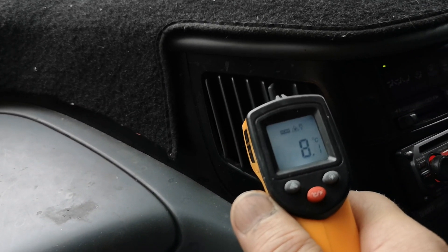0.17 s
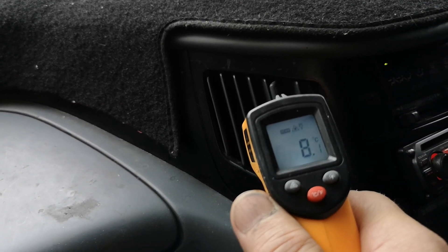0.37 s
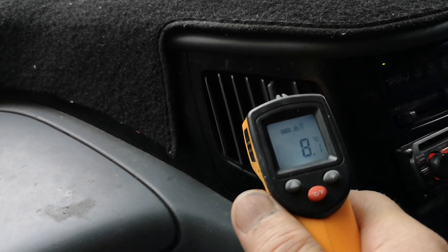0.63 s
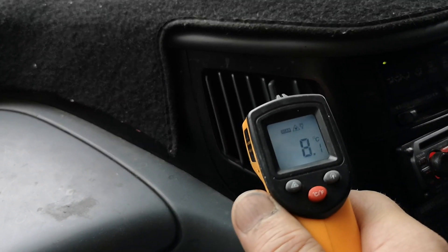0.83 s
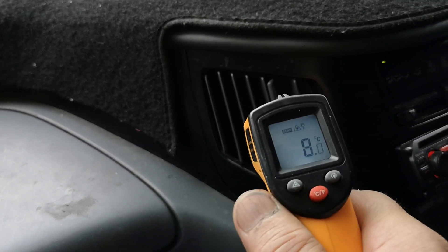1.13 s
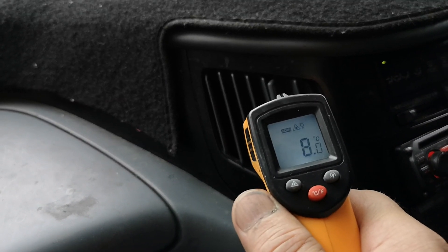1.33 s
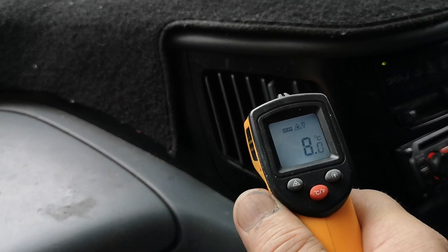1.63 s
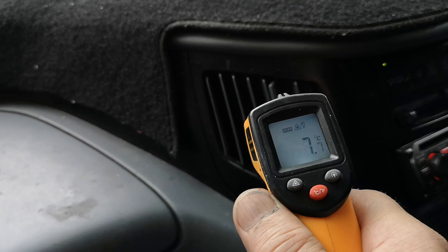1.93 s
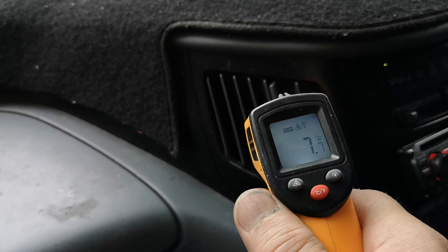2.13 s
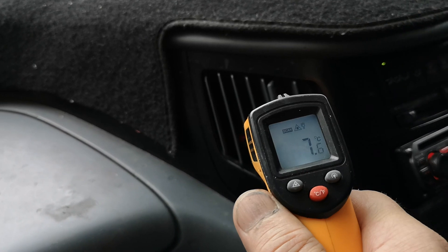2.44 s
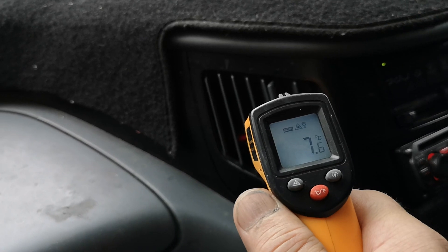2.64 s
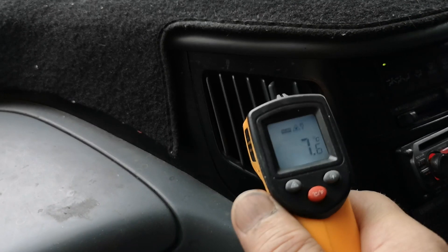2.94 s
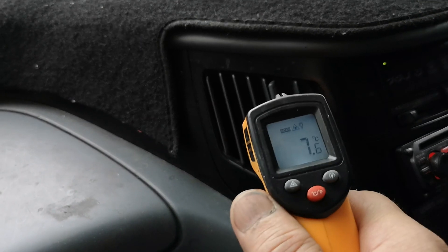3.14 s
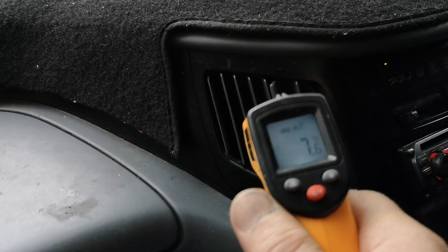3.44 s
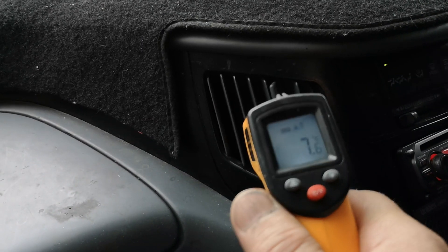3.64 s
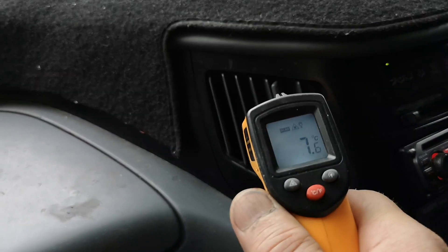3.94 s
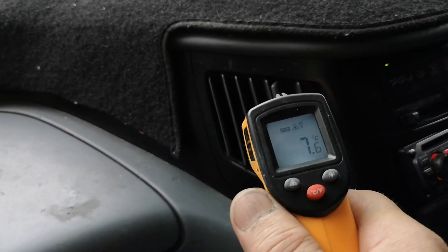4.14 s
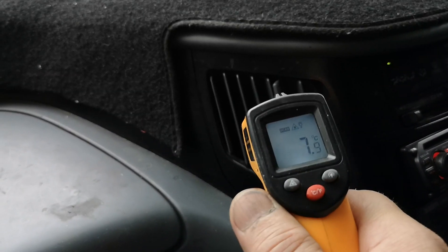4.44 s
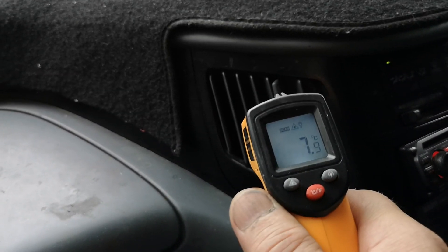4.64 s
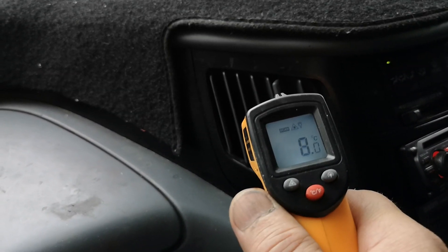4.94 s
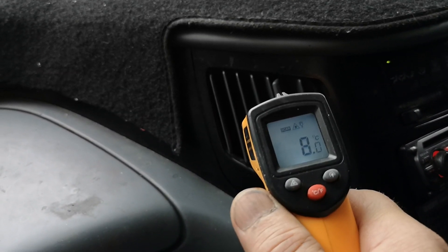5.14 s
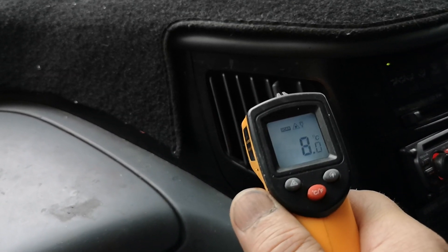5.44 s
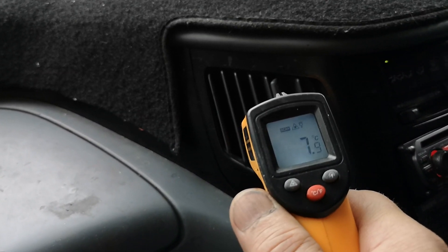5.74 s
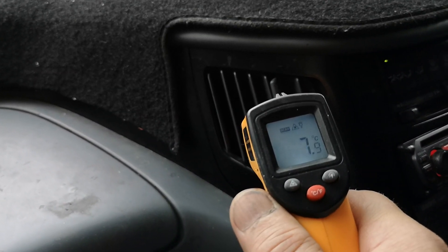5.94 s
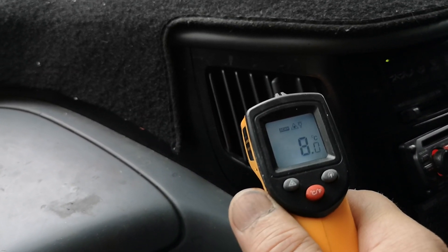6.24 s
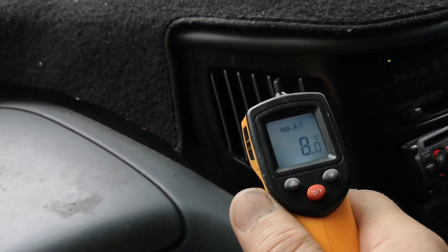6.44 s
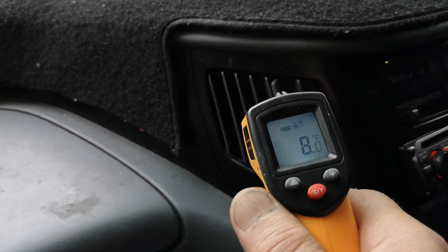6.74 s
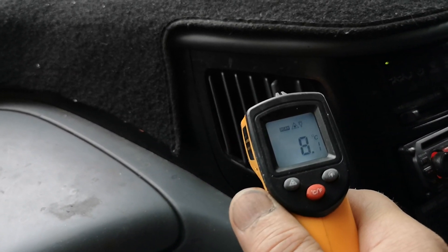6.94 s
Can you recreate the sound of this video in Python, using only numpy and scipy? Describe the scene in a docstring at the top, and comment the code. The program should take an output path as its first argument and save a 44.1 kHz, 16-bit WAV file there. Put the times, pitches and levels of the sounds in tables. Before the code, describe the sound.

A constant low engine boom fills a small, dry car cabin while vent air rushes quietly and hollowly near the microphone. Dull wind thumps batter it at uneven intervals, separate at first, sparser in the middle, then thicker and in rumbling clusters until the end. A very faint, high, fuzzy slat whistle hides in the hiss. Close stereo pickup, with the puffs differing slightly between sides.

```python
"""A car's air conditioning blows from a dashboard vent while the engine idles, heard close to the grille.
From the start the cabin booms at the engine's firing rate (sine waves), air rushes (coloured noise), and
puffs of the jet buffet two microphone ports (short pulses with noisy wakes). A faint whistle at the slats
(narrow noise) is clearest near 1.5 s. The listed puffs thin out from about 2.2 s; after 4.2 s they crowd
together, with a second rise of the whistle near 4.6 s. All of it runs on to the end at about 7.1 s."""
import sys
import numpy as np
from scipy import signal
from scipy.fft import rfft, irfft, next_fast_len
from scipy.io import wavfile

SR = 44100
rng = np.random.default_rng(int(sys.argv[2]) if len(sys.argv) > 2 else 0)


def pcm_store(signal):
    """Save signal as 16-bit PCM."""
    levels = np.round(np.clip(np.atleast_2d(signal), -1, 1) * 32767)
    wavfile.write(sys.argv[1], SR, levels.astype(np.int16).T)


N = 313012  # length in samples


def amp(db):
    """Turns decibels into a gain."""
    return 10 ** (np.asarray(db) / 20)


def evened(x):
    """Scales a sound to an average strength (rms) of 1."""
    return x / np.sqrt(np.mean(x ** 2) + 1e-20)


def read(points, hz, axis=1):
    """Reads one column of a spectrum table, on a log-frequency axis."""
    columns = np.transpose(points)
    return np.interp(np.log(hz + 1), np.log(columns[0] + 1), columns[axis])


def curves(rows):
    """Draws the columns of a time table as lines, one value per sample."""
    s, *columns = np.transpose(rows)
    t = np.arange(N) / SR
    return [np.interp(t, s, column) for column in columns]


def noise(gain):
    """Makes noise of rms 1 whose spectrum is shaped by the function gain(Hz)."""
    size = next_fast_len(N)
    hz = np.fft.rfftfreq(size, 1 / SR)
    spectrum = rfft(rng.standard_normal(size)) * gain(hz)
    return evened(irfft(spectrum, size)[:N])


def wander(rate):
    """Makes a slow random curve of rms 1, changing up to about rate times a second."""
    return noise(lambda hz: np.exp(-(hz / rate) ** 2) * hz / (hz + 1))


def add(mix, start, sound):
    """Mixes a sound in from sample start on, cutting off what lies outside."""
    part = mix[max(start, 0):max(start + len(sound), 0)]
    part += sound[max(-start, 0):][:len(part)]


# Firing rate of the idling engine. Each row: time in seconds, rate in Hz.
FIRING_RATE = [(0, 39.5), (.6, 38.8), (1.25, 38.2), (1.7, 39), (2.4, 38.8), (3.0, 39.9), (3.9, 39.7),
               (4.8, 38.3), (5.35, 38.9), (5.85, 38.4), (6.3, 39.5), (7.1, 39.2)]
# Tones tied to the engine. Each row: multiple of the firing rate, level in dB rms.
ENGINE_ORDERS = [(.5, -32), (1, -18), (2, -46.5), (3, -38.5)]
# Steady low hums, the upper perhaps from the turning blower. Each row: frequency in Hz, level in dB rms.
LOW_HUMS = [(22.9, -33.5), (52.6, -36)]


def engine():
    """The firing rate hunts a little and the cabin booms with it, over steady hums, alike at both ports."""
    t = np.arange(N) / SR
    firings = np.cumsum(curves(FIRING_RATE)[0]) / SR  # firings counted so far
    boom = sum(amp(db) * np.sin(2 * np.pi * (k * firings + rng.random())) for k, db in ENGINE_ORDERS)
    hums = sum(amp(db) * np.sin(2 * np.pi * (hz * t + rng.random())) for hz, db in LOW_HUMS)
    return np.sqrt(2) * (boom + hums)  # a sine of rms 1 peaks at the root of 2


# Colour of the rushing air. Each row: frequency in Hz, relative left and right level in dB per Hz.
AIR_COLOUR = [(623, -2, -5.5), (940, -8, -12), (1724, -0.5, -6), (2940, -6.5, -12.5), (2975, -9.5, -16),
              (4400, -17, -21), (5840, -15.5, -21), (6140, -21, -25.5), (7730, -15, -26),
              (8200, -19, -32.5), (9180, -20.5, -25), (9880, -34, -28.5), (11000, -36, -36.5),
              (14800, -42.5, -43)]
# Resonances of duct and grille.
# Each row: centre in Hz, half-width in Hz (to 1/e of the dB lift), left and right lift in dB.
DUCT_RESONANCES = [(671, 44, 7, 3), (977, 110, 7, 4), (1310, 100, 5.5, 5), (1460, 67, 2.5, 0),
                   (1738, 25, 1.5, 6), (1852, 45, 4, 1), (1970, 58, -2, 5), (2510, 25, 2, -3),
                   (2613, 30, 4, 3.5), (2730, 49, -1, 0.5), (3425, 22, 6.5, -2.5)]
# Likeness of the rush at the two ports. Each row: frequency in Hz, correlation from -1 to 1.
PORT_LIKENESS = [(200, 0.91), (450, -0.52), (780, -0.05), (1000, 0.15), (1450, 0.58), (1900, -0.021),
                 (2300, -0.17), (3300, 0.094), (9000, -0.07)]
AIR_DB = -40.5  # rms over both ports, before the wavering and swelling


def vent(waver_db, waver_rate):
    """Turbulence at the slats, coloured by the duct; each port hears its own mix of the resonances."""
    size = next_fast_len(N)
    hz = np.fft.rfftfreq(size, 1 / SR)
    left, other = rfft(rng.standard_normal((2, size)))
    same = np.clip(read(PORT_LIKENESS, hz), -1, 1)
    right = same * left + np.sqrt(1 - same ** 2) * other
    colour_db = np.array([read(AIR_COLOUR, hz, axis=1), read(AIR_COLOUR, hz, axis=2)])
    for centre, width, *lift_db in DUCT_RESONANCES:
        colour_db += np.outer(lift_db, np.exp(-((hz - centre) / width) ** 2))
    rush = evened(irfft(np.array([left, right]) * amp(colour_db), size)[:, :N])
    return amp(AIR_DB + waver_db * wander(waver_rate)) * rush


# Gain of the brightest band of the rush. Each row: time in seconds, gain in dB.
BAND_SURGE = [(0, -.5), (.28, 0.9), (.7, 1), (.85, 1), (1.05, 0.2), (1.4, 0.5), (1.62, 0.5), (1.98, -0.2),
              (2.3, 1), (2.5, 1), (2.9, -.2), (3.28, 1), (3.78, 0.4), (3.95, 1.5), (4.6, 0.2), (6.0, 0.4),
              (6.38, 0.8), (6.7, 0.7)]


def swelling(rush, centre_hz, width_hz):
    """The brightest band of the rush swells and sinks gently on its own."""
    size = next_fast_len(N)
    hz = np.fft.rfftfreq(size, 1 / SR)
    bell = np.exp(-((hz - centre_hz) / width_hz) ** 2)
    band = irfft(rfft(rush, size) * bell, size)[:, :N]
    return rush + band * (amp(curves(BAND_SURGE)[0]) - 1)


# Strength of the whistle at the slats. Each row: time in seconds, left level in dB rms.
WHISTLE_LEVEL = [(0, -70), (1.3, -68.5), (1.55, -65), (1.9, -70), (2.3, -70), (2.6, -70), (3.3, -72),
                 (4.3, -75), (4.6, -67), (5.3, -69), (5.6, -76), (7.1, -75)]
WHISTLE_HZ = 9045


def whistle(right_db, width_hz):
    """Air over a sharp edge sings a thin, fuzzy note that comes and goes."""
    def peak(hz):
        """Lets through only a narrow peak around the note."""
        return 1 / (1 + ((hz - WHISTLE_HZ) / width_hz) ** 2)

    note = np.array([amp(db) * noise(peak) for db in (0, right_db)])
    return amp(curves(WHISTLE_LEVEL)[0]) * note


# Colour of the jet's flutter on the microphone. Each row: frequency in Hz, relative level in dB per Hz.
FLUTTER_COLOUR = [(4, -24), (20, -7.5), (72, -1), (110, -3.5), (160, -9.5), (230, -17), (330, -20.5),
                  (450, -26.5), (700, -62), (2000, -83)]
# Strength of the jet on the microphone. Each row: time in seconds, level in dB before the flutter's trim.
JET_LEVEL = [(0, -24), (2.4, -25.5), (4.0, -25.5), (5.2, -23.5), (6.1, -23.5), (6.45, -26.5), (7.1, -23.5)]


def flutter(lumps, level_db, split_hz):
    """Small eddies pass without pause; their upper part comes in lumps."""
    flow = noise(lambda hz: amp(read(FLUTTER_COLOUR, hz)))
    lowpass = signal.butter(2, split_hz, fs=SR, output="sos")
    slow = signal.sosfiltfilt(lowpass, flow)
    lumpy = lumps * (flow - slow)
    return amp(curves(JET_LEVEL)[0] + level_db) * evened(slow + lumpy)


# Longer swells of the jet under the clusters of puffs.
# Each row: middle in seconds, length in seconds, level in dB before a common trim.
JET_SWELLS = [(1.915, 0.047, -29.5), (2.147, 0.045, -29), (4.217, 0.06, -29), (4.47, 0.12, -26),
              (4.61, 0.08, -26.5), (4.72, .08, -28), (5.01, .09, -25.5), (5.45, 0.077, -25),
              (6.205, 0.08, -27.5), (6.735, .14, -22)]


def swells(level_db, knee_hz, steep):
    """The jet leans on the microphone for a moment: a soft, low roar that joins the puffs."""
    t = np.arange(N) / SR
    power = sum(amp(db) ** 2 * np.exp(-(2 * (t - s) / length) ** 2) for s, length, db in JET_SWELLS)
    roar = noise(lambda hz: (hz / knee_hz) ** 1.4 / (1 + (hz / knee_hz) ** steep))
    return amp(level_db) * np.sqrt(power) * roar


# Level over the jet and its spread either way are in dB, before the trim of the puffs.
EDDIES_PER_S, EDDY_DB, EDDY_SPREAD_DB, EDDY_HZ = 6, -4, 4, 175


def eddies(count=80):
    """The slats shed small eddies at uneven intervals, their strength following the jet; rows like PUFFS."""
    late = rng.random(count)
    strength = 2 * rng.random(count) - 1
    times = (np.arange(count) + late) / EDDIES_PER_S
    levels = np.interp(times, *np.transpose(JET_LEVEL)) + EDDY_DB + EDDY_SPREAD_DB * strength
    return [(s, db, EDDY_HZ) for s, db in zip(times, levels) if s < N / SR]


PUFF_S = .01  # a puff's level is its rms if all its energy fell within this many seconds


def buffets(rows, level_db, narrow, spill_db, wake, wake_s, size=4096):
    """Each puff is one quick swing of pressure in a short, uneven wake; faster ones reach higher."""
    t = (np.arange(size) - size // 2) / SR  # the puff sits in the middle of its frame
    hz = np.fft.rfftfreq(size, 1 / SR)
    out = np.zeros(N)
    for s, db, centre_hz in rows:
        swing = np.exp(2j * np.pi * rng.random()) * rfft(1.0 * (t == 0))
        swirl = np.exp(-abs(t) / wake_s) * rng.standard_normal(size)
        swirl /= np.linalg.norm(swirl)
        ratio = hz / centre_hz
        hump = (ratio * np.exp(.5 - .5 * ratio ** 2)) ** narrow
        spill = amp(spill_db) * ratio ** 2 / (1 + ratio ** 5)  # spreads wider around the hump
        puff = irfft((swing + wake * rfft(swirl)) * (hump + spill))
        puff *= np.sqrt(PUFF_S * SR / np.sum(puff ** 2))
        add(out, int(s * SR) - size // 2, amp(db + level_db) * puff)
    return out


def across_ports(right, stray, crossing_s, weaker_db, small_hz, mixing):
    """Eddies reach the right port first; small ones arrive late, weakened and partly remixed at the left."""
    size = next_fast_len(N + SR // 10)
    hz = np.fft.rfftfreq(size, 1 / SR)
    small = hz ** 2 / (hz ** 2 + small_hz ** 2)  # near 0 for large eddies, near 1 for small ones
    lost = np.clip(mixing * small, 0, 1)
    delay = np.exp(-2j * np.pi * hz * crossing_s * small)
    carried = np.sqrt(1 - lost) * delay * rfft(right, size)
    remixed = np.sqrt(lost) * rfft(stray, size)
    left = amp(weaker_db * small) * (carried + remixed)
    return np.array([irfft(left, size)[:N], right])


# The puffs that hit the microphone, singly and in clusters.
# Each row: middle in seconds, level in dB before a common trim, centre in Hz.
PUFFS = [(.010, -18, 180), (.030, -22.5, 185), (.057, -17.5, 187), (.185, -24, 170), (0.375, -26, 207),
         (.450, -15.5, 155), (0.632, -21, 200), (0.748, -27.5, 157), (0.777, -27, 145), (.869, -23, 152),
         (0.912, -19.5, 146), (1.085, -20, 155), (1.194, -19, 175), (1.217, -23.5, 200), (1.316, -20, 148),
         (1.359, -14.5, 130), (1.575, -14.5, 150), (1.809, -17, 176), (1.9, -28.5, 455),
         (1.902, -19.5, 170), (1.925, -21.5, 225), (2.007, -23.5, 180), (2.152, -17.5, 190),
         (2.41, -32, 220), (2.471, -18.5, 134), (2.645, -24, 161), (2.862, -17, 154), (2.975, -21.5, 170),
         (3.085, -20, 168), (3.097, -16, 154), (3.135, -21.5, 135), (3.255, -30, 170), (3.285, -23, 168),
         (3.864, -20, 150), (3.898, -21, 157), (4.065, -32, 199), (4.224, -22, 245), (4.246, -26, 234),
         (4.434, -16, 190), (4.454, -20, 201), (4.485, -20.5, 275), (4.549, -13.5, 145), (4.62, -20.5, 202),
         (4.691, -23, 240), (4.718, -21.5, 185), (4.736, -13.5, 202), (4.863, -21.5, 195),
         (4.996, -14, 165), (5.029, -17.5, 184), (5.05, -23, 195), (5.103, -23.5, 143), (5.126, -17, 140),
         (5.190, -19.5, 158), (5.272, -15, 171), (5.282, -27, 415), (5.425, -22.5, 350),
         (5.438, -14.5, 167), (5.462, -15.5, 211), (5.479, -21, 220), (5.655, -19, 181), (5.795, -18, 154),
         (5.991, -16.5, 130), (6.072, -17.5, 160), (6.076, -21.5, 320), (6.190, -21.5, 240),
         (6.211, -27, 195), (6.234, -16.5, 235), (6.257, -24, 187), (6.667, -18, 155), (6.69, -13, 166),
         (6.721, -18.5, 175), (6.752, -23, 180), (6.772, -19.5, 166), (6.856, -28.5, 260),
         (6.89, -22.5, 192), (6.935, -20, 125), (6.99, -18.5, 164), (7.057, -22.5, 180)]


def jet(lumpy_db, lump_rate):
    """The jet on the microphone: two flows with puffs and swells at the same times, each with its own swirls."""
    lumps = amp(lumpy_db * np.tanh(wander(lump_rate)))
    gusts = [*PUFFS, *eddies()]

    def flow():
        """Adds up one flow of the jet."""
        steady = flutter(lumps, level_db=-0.5, split_hz=76)
        roar = swells(level_db=-0.5, knee_hz=180, steep=6.1)
        puffs = buffets(gusts, level_db=-1.87, narrow=3.0, spill_db=2, wake=0.78, wake_s=0.0096)
        return steady + roar + puffs

    right, stray = flow(), flow()
    ends = signal.windows.tukey(N, .002)  # fades of about 7 ms at both ends
    return across_ports(ends * right, ends * stray,
                        crossing_s=0.00094, weaker_db=-2.5, small_hz=124, mixing=0.59)


def scene():
    """Engine boom and low hums, the rush and whistle of the vent, and its jet on the microphone."""
    air = vent(waver_db=0.32, waver_rate=11)
    rush = swelling(air, centre_hz=1550, width_hz=450)
    note = whistle(right_db=-2.0, width_hz=18)
    return engine() + rush + note + jet(lumpy_db=4.0, lump_rate=42)


EDGE_HZ = 15300  # the treble is removed above this


def record(dry):
    """The recorder's band limit: a steep low-pass run forwards and backwards, so nothing is delayed."""
    lowpass = signal.cheby2(14, 40, EDGE_HZ, fs=SR, output="sos")
    return signal.sosfiltfilt(lowpass, dry)


dry = scene()
out = record(dry)
pcm_store(out)
```